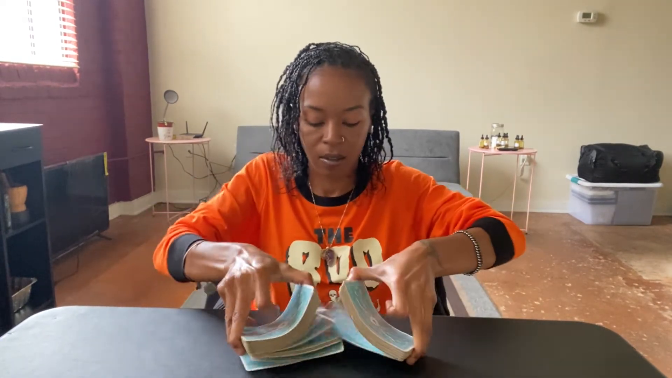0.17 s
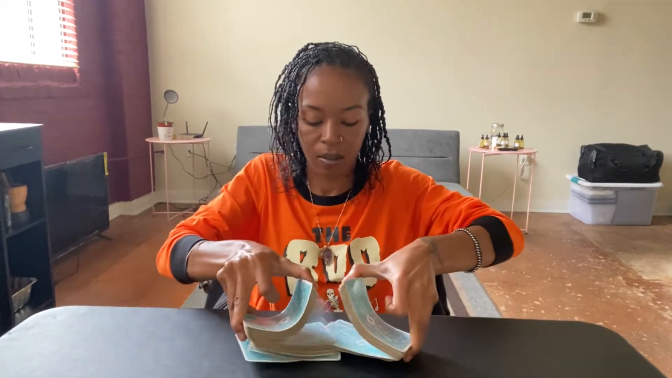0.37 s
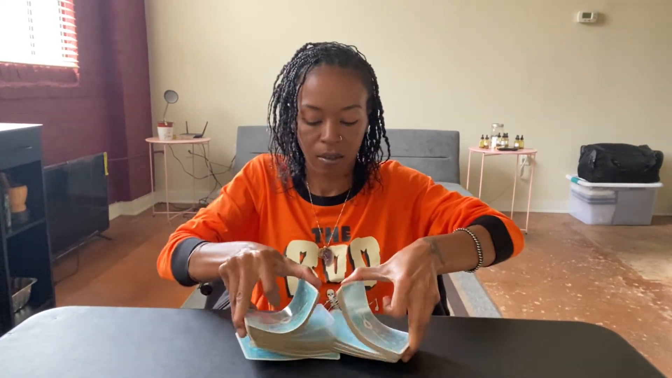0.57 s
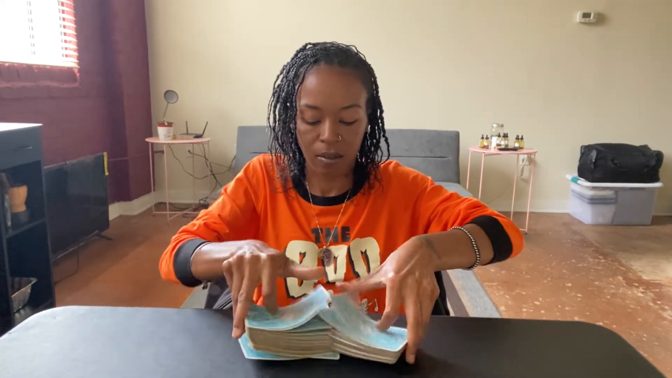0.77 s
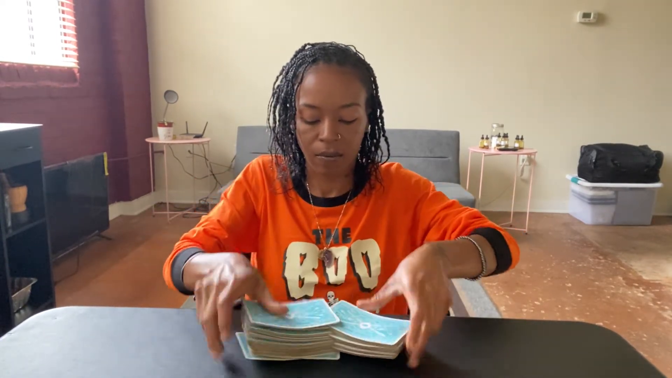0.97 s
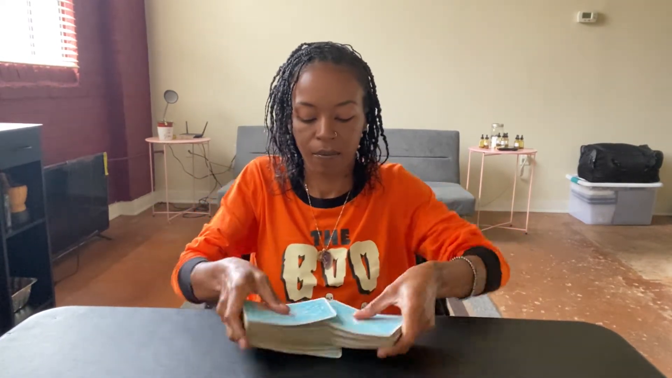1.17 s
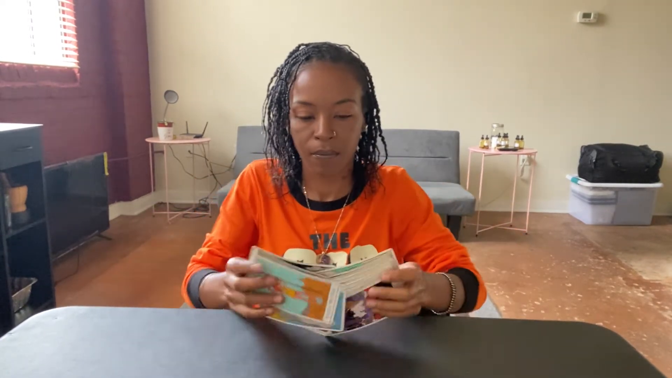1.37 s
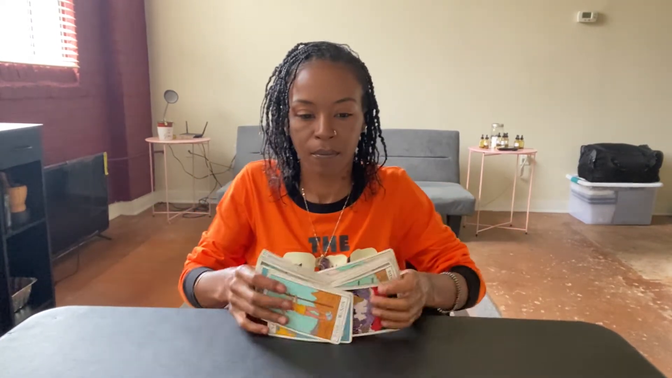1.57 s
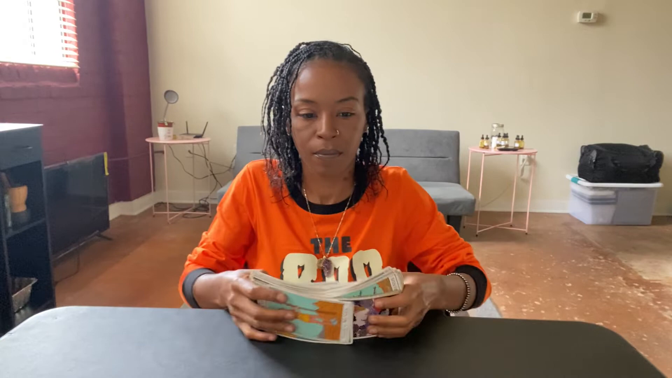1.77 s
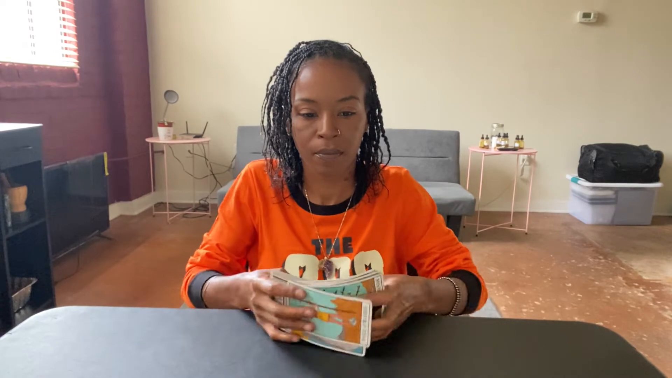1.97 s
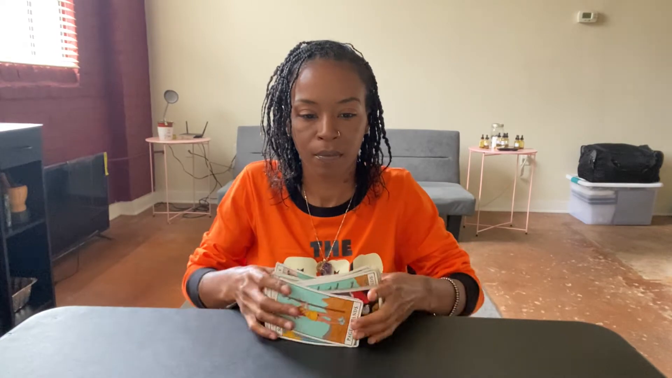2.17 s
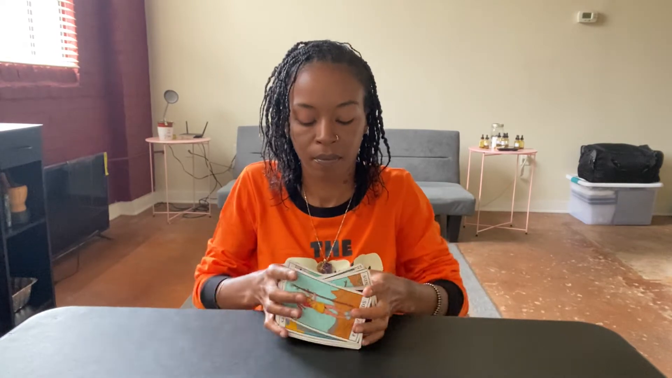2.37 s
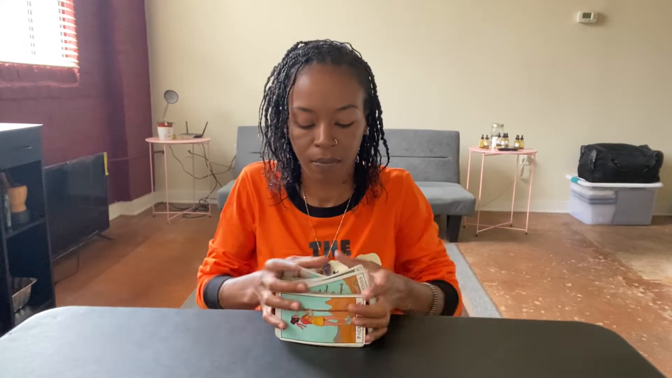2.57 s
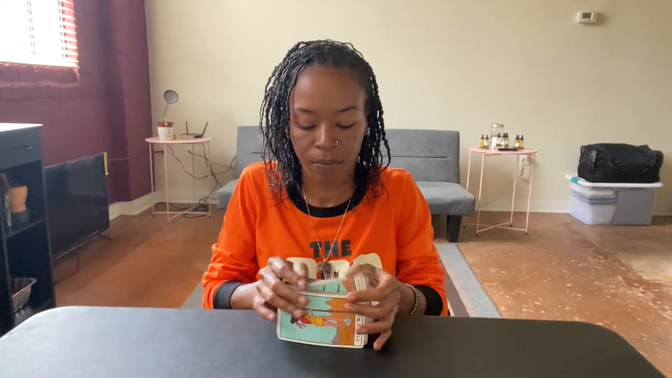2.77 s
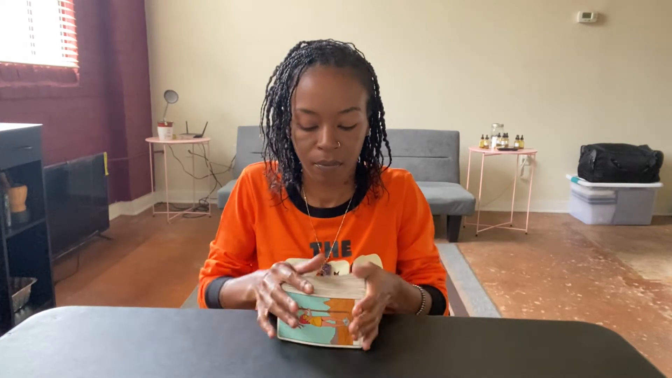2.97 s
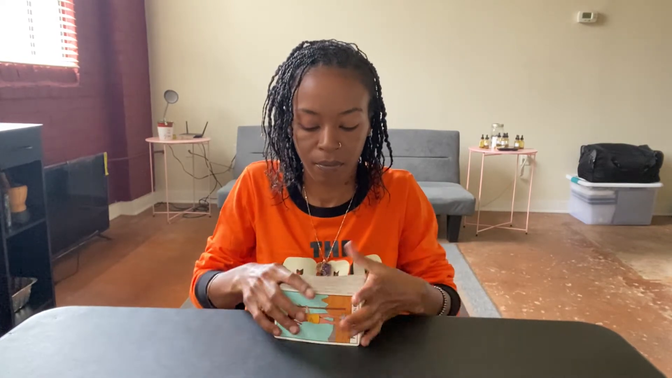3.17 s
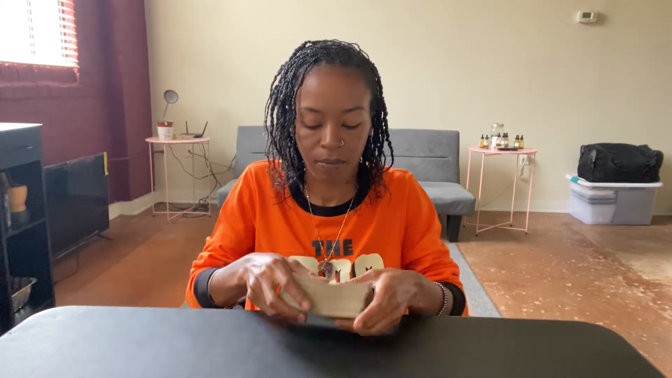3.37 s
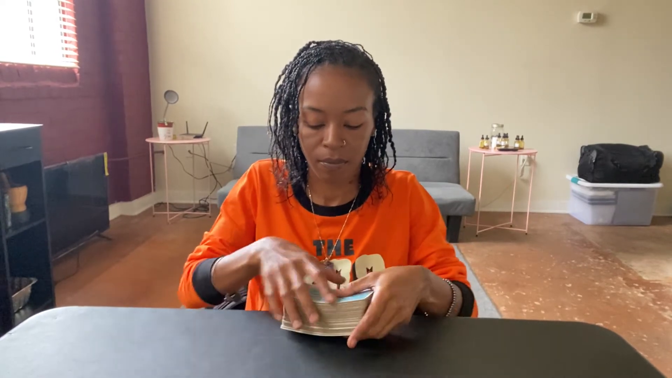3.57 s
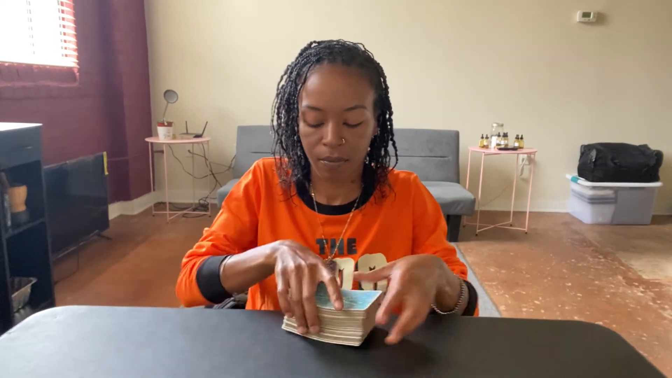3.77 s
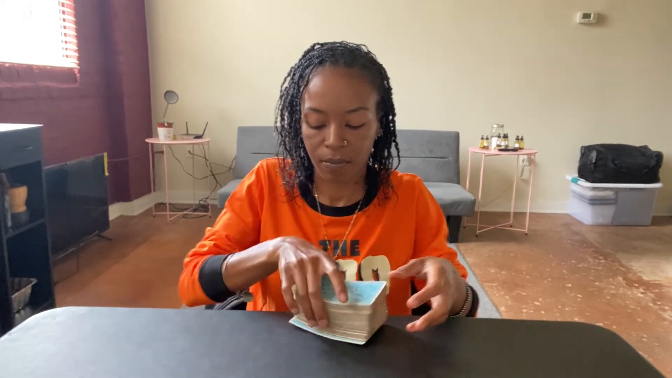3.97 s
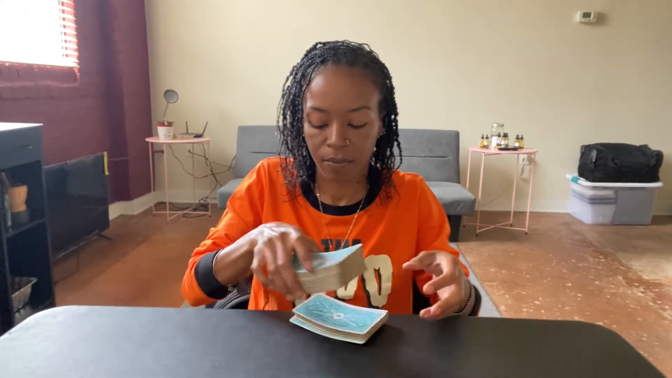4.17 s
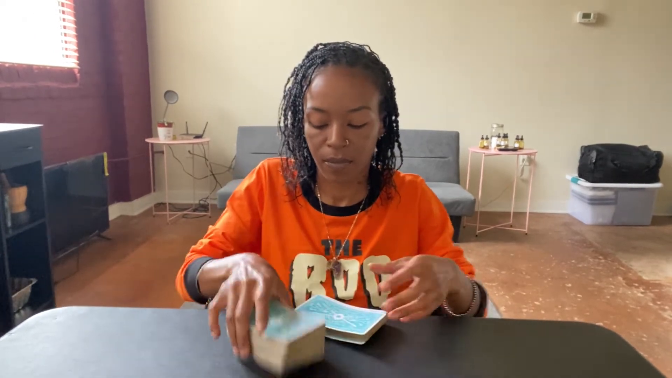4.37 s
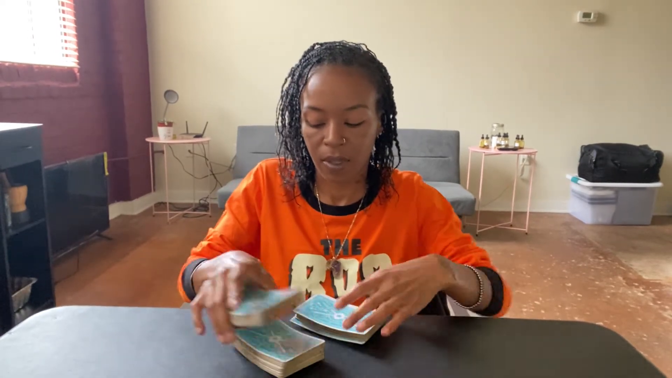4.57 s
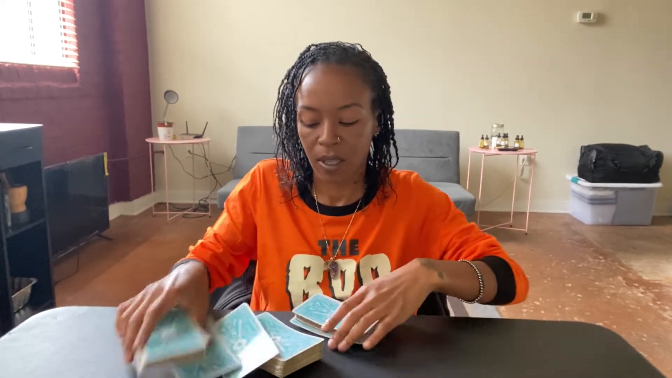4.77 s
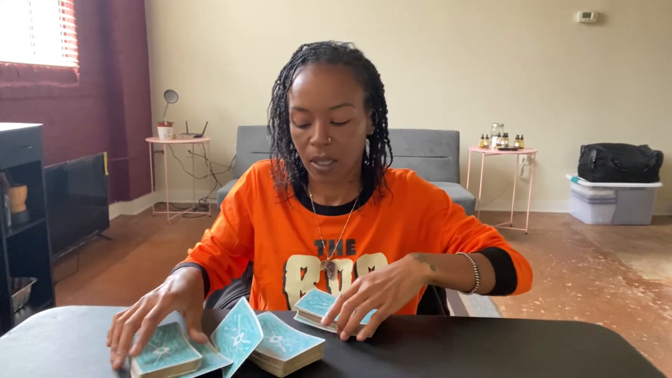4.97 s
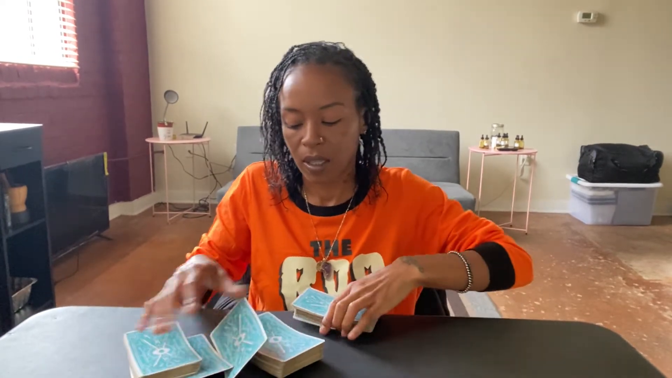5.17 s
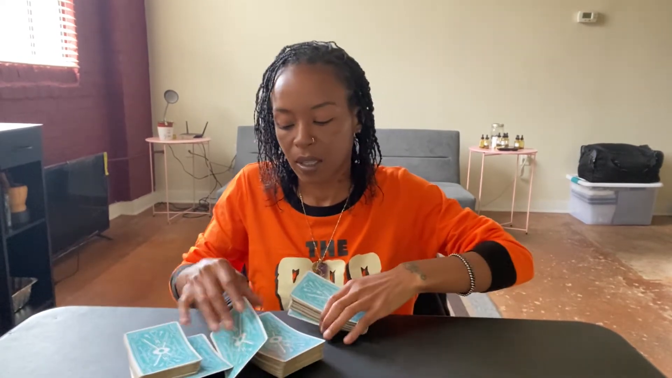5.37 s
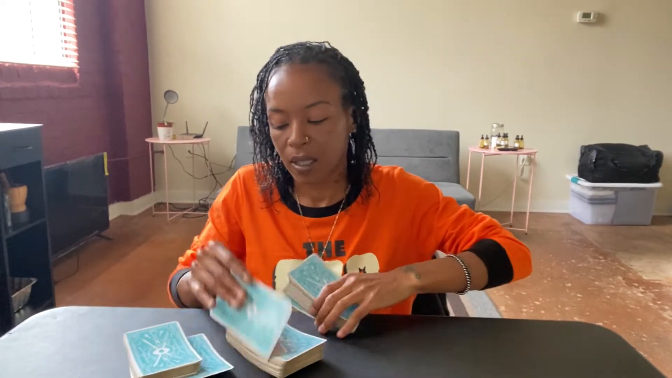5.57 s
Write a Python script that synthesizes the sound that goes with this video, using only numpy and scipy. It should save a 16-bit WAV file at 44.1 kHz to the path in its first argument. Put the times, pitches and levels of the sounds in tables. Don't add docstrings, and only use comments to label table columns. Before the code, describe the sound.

Large stiff cards riffle together in a crackling burst on a hollow table, clack while being squared, then drop in soft piles.

```python
import sys
import numpy as np
from scipy import signal
from scipy.fft import rfft, irfft
from scipy.io import wavfile
from scipy.ndimage import uniform_filter1d

SR = 44100
rng = np.random.default_rng(int(sys.argv[2]) if len(sys.argv) > 2 else 0)


def to_wav(sig):
    pcm = np.clip(np.atleast_2d(sig), -1, 1) * 32767
    pcm = np.round(pcm).astype(np.int16)
    wavfile.write(sys.argv[1], SR, pcm.T)


def ratio_of_db(decibels):
    return 10 ** (np.asarray(decibels, float) / 20)


N = 247266

# frequency in Hz, level in dB.
AIR = [(20, -21), (40, 1.5), (70, -13), (95, -1.5), (130, -8), (240, -14), (450, -16), (700, -20),
       (2500, -43.5), (10000, -45.5), (14000, -45), (15500, -85.5)]
# frequency in Hz, rms level in dB.
HUM = [(59.2, -39.5), (118.4, -60.5)]
# frequency in Hz, time to fall 60 dB in seconds.
REVERB_TIME = [(100, 0.36), (260, 0.23), (700, 0.78), (1800, 0.65), (5000, 0.73), (9000, 0.45),
               (15000, 0.573)]
# frequency in Hz, level in dB.
REVERB_LEVEL = [(100, -10), (400, 4.5), (1000, -5), (4000, 1), (12000, -8.5)]
# delay in seconds, left level in dB, right level in dB.
ECHOES = [
    (.0042, -1.5, -28),
    (.0078, -31, -3),
]
# frequency in Hz, level in dB.
CLOTH = [(2000, -6.5), (5800, -7.0), (7600, -18.5)]
# frequency in Hz, correlation from 0 to 1.
PORT_LIKENESS = [(60, .9), (250, .2), (700, .1), (2500, 0), (6300, 0), (7100, .5), (7900, .97),
                 (10500, .995), (16000, .9)]
# frequency in Hz, lead in radians.
LEFT_LEAD = [(0, .35), (300, -.1), (700, 0), (6200, -1.9), (8000, 0), (8800, .9), (9700, 2.4),
             (10500, 3.14), (13000, 6.28), (16200, 9.5)]
# frequency in Hz, left minus right in dB.
LEFT_LEAN = [(60, 0.9), (180, 1), (350, 2.5), (700, -0.3), (2200, 1.8), (5500, -0.5), (7100, -3),
             (8000, -0.5)]
# frequency in Hz, level in dB.
MIC = [(20, -34), (45, 0.5), (14500, -4.5), (16500, -12)]

# frequency in Hz, width in Hz, level in dB.
HOLLOW_MODES = [(431, 12.3, -16), (980, 126, -15.5), (1300, 360, -13.5), (1760, 580, -18)]
# frequency in Hz, width in Hz, level in dB.
TABLE_MODES = [(69.4, 22, 2), (113.6, 17, 1.5), (140, 11, 2), (174.1, 10, -5.5), (190.5, 21.5, -5.5),
               (361, 29, -14)]
# frequency in Hz, width in Hz, level in dB.
PILE_MODES = [(365, 100, 5), (411, 79, 15), (539, 87, 11), (780, 40, -7.5)]
# frequency in Hz, width in Hz, level in dB.
FACE_MODES = [(965, 297, 3), (1300, 40, 1.5), (1810, 380, -3), (2724, 1650, -15.5), (4350, 300, -21)]
# frequency in Hz, width in Hz, level in dB.
MUFFLED_MODES = [(3160, 1350, -3.0), (1900, 490, 4.1)]
# frequency in Hz, level in dB.
EDGE = [(500, -22), (900, -5), (1900, -1), (3200, 0), (4200, -3), (6000, -5), (9000, -10), (16000, -40)]
# frequency in Hz, level in dB.
HISS = [(2500, -1), (3300, -4), (4500, 0), (6500, -5), (8500, -8), (10000, -22.5)]
# frequency in Hz, level in dB.
FIZZ = [(6000, -37.5), (8000, -6), (10500, 2), (13000, -3), (15000, -13.5), (16500, -29)]

# time in seconds, sliding speed in dB,
# cupping of the hands round the deck in dB, weight on the table in dB.
SLIDE = [(0.0, -67, -19, -58), (0.149, -69, 20.5, -36.5), (0.33, -62.5, 15.5, -41.5),
         (0.549, -42, 10.5, -25), (0.72, -40.5, 10.5, -29), (0.86, -76, 24, -99), (1.039, -58.5, 7.5, -34),
         (1.251, -64.5, 7.5, -57.5), (1.62, -67, 10, -41), (1.86, -55, 6, -40.5), (2.3, -72.5, 11, -44),
         (2.6, -50.5, 11, -35.5), (2.99, -71.5, 8.5, -60.5), (3.281, -64, 3, -43), (4.2, -93, -8, -62.5),
         (4.65, -78.5, 16.5, -47), (4.88, -63.5, 14, -50.5), (5.35, -78, -4.5, -53.5)]
# start in seconds, peak in dB, hiss in dB against the scrape,
# fizz in dB against the scrape, fall in ms.
SCRAPES = [(0.264, -30.5, -9, -26.5, 8), (1.045, -20.5, -9.5, -39, 29.2), (1.549, -49, -31, -21, 22),
           (1.798, -26, -39.5, -51, 5.3), (1.877, -38.5, -4.5, -24, 24), (2.065, -33.5, -22, -35, 23),
           (2.32, -38.5, -11.5, -29.5, 23), (2.938, -44.5, -17, -25, 18), (3.212, -31.5, -16.5, -36, 23),
           (3.279, -43, -5, -22, 41), (3.341, -30, -17, -36, 12.4), (3.648, -34, -28, -40, 35),
           (4.601, -42.5, -44, -10.5, 2.2), (4.771, -36, 2.5, -37, 5.1), (4.785, -26.5, -5, -37, 19),
           (5.451, -46.5, -18.5, -34, 92), (5.556, -45, -29, -47, 14)]
# start in seconds, peak in dB, pitch in Hz, fall in ms,
# slap in dB against the boom.
LANDINGS = [(0.112, -22, 114, 1.7, -11), (0.158, -23, 122.2, 6.5, -26), (0.411, -28.5, 130.3, 11, -12),
            (0.464, -26.5, 135, 8.3, -36), (0.519, -18.5, 109.2, 13, -29), (0.558, -26, 157.4, 5.9, -31),
            (0.604, -13.5, 84.3, 8.2, -19.5), (0.662, -8, 121.6, 6.6, -23.5),
            (0.716, -12.5, 143.3, 10.8, -37.5), (0.748, -16, 90.2, 8.24, -47),
            (0.768, -17.5, 80.8, 2.6, -36), (1.021, -17, 159.6, 8.4, -25.5), (1.035, -5, 108, 2.86, -34),
            (1.084, -20.5, 137.5, 8.8, -26), (4.4227, -15.5, 140, 3.6, -17), (4.4297, -13.5, 140, 4.7, -19),
            (4.449, -14, 77.3, 2.9, -18.5), (4.475, -25, 159.6, 23, -15), (4.716, -21, 87.9, 3.2, -33),
            (4.779, -27, 152, 6.3, -10), (4.823, -20.5, 150, 13, -18.5), (4.841, -16, 166.2, 3.1, -23),
            (4.847, -13.5, 101.5, 6.2, -19.5), (4.8623, -19, 120.2, 11.8, -41)]
# start in seconds, peak in dB, pitch in Hz,
# slap in dB against the boom.
KNOCKS = [(1.462, -12.5, 196.6, -12.5), (1.474, -15, 197, -12.5), (1.698, -19.5, 158, 0.5),
          (1.769, -21, 110, -16.5), (1.92, -24, 79, -18), (2.015, -27, 95, -16), (2.067, -28, 106, -1),
          (2.13, -20.5, 122, -15), (2.292, -34.5, 82.6, 7), (2.453, -21, 155, 2.5), (2.552, -29, 128, -2.5),
          (2.901, -27.5, 80.7, -15.5), (3.014, -32.5, 118, -9.5), (3.248, -32.5, 88, -9),
          (3.329, -36, 80.7, 2), (3.503, -27.5, 82, -40.5)]
# start in seconds,
# peak in dB, pitch in Hz, fall in ms, slap in dB against the note.
UNDERTONES = [(0.103, -34.5, 2200, 1.8, -35), (0.103, -42, 3335, 2.8, -26), (0.599, -17, 355, 2.3, -27),
              (0.679, -21, 64.3, 24, -44.5), (1.462, -15.5, 83, 4.4, -32), (1.461, -18.5, 358, 3.1, -28),
              (1.7, -26, 476, 5.8, -27), (1.714, -21.5, 479, 2.9, -36), (1.7365, -18, 482, 3.1, -29),
              (1.773, -24, 505, 2.3, -36), (1.936, -33.5, 374, 4.7, -29), (2.079, -26.5, 434, 2.6, -35),
              (2.121, -24.5, 438, 1.9, -27), (2.41, -30, 406, 5.3, -33), (2.471, -21.5, 435, 2.1, -32),
              (2.548, -21, 413, 2.9, -33), (2.615, -29.5, 425, 3.4, -30.5), (3.353, -39.5, 447, 3, -31.5),
              (3.326, -32, 425, 20, -27.5), (3.424, -45.5, 416, 9.2, -29.5), (3.497, -52, 398, 5.5, -30.5),
              (3.655, -45, 944, 16, -31), (3.662, -53, 1835, 14, -29.5), (3.664, -52, 4350, 3.5, -30),
              (4.415, -27.5, 726, 3.5, -34.5), (4.418, -36, 1950, 2.2, -32), (2.795, -35.5, 129.7, 14, -34),
              (4.423, -17, 344, 4.1, -49), (4.844, -25, 328, 5.4, -31), (5.558, -40, 998, 9, -28.5),
              (5.562, -45.5, 1905, 3.8, -30), (5.562, -46, 394, 9, -32.5)]
# peak time in seconds, peak in dB, pitch in Hz, half length in ms.
OVERTONES = [(0.105, -41, 1000, 0.88), (0.509, -37, 4200, 1.2), (0.5975, -22, 1520, 1.2),
             (0.7115, -14.5, 1940, 0.82), (0.7235, -31, 4400, 1.2), (1.062, -42, 4400, 2),
             (1.4625, -32, 1500, 1.2), (1.4635, -22, 780, 3.1), (1.468, -13.5, 336, 1.6),
             (1.4815, -44, 2940, 1.8), (1.482, -33, 1600, 1.2), (1.489, -19, 408, 4.5),
             (1.6995, -37, 2380, 1.8), (1.7365, -42, 3060, 1.2), (1.741, -29.5, 2950, 1.2),
             (1.7425, -19.5, 1690, 1.4), (1.767, -48, 2720, 2.4), (2.017, -53, 3060, 1.2),
             (2.0655, -55, 3520, .8), (2.0655, -48, 7110, .8), (2.068, -35, 1810, 2.4),
             (2.105, -47, 4040, 1.8), (2.4075, -22.5, 1740, 1.6), (2.4075, -42.5, 3350, 1.4),
             (2.4575, -31, 2230, 1.6), (2.4565, -35, 3250, 1.2), (2.467, -45, 3200, 1.4),
             (2.547, -48, 7570, 1.2), (2.548, -45.5, 3500, 1.4), (2.616, -55, 7760, 1.2),
             (3.1735, -52.5, 3130, 2.4), (3.353, -54, 4430, 2.7), (3.3565, -53, 3340, 2.4),
             (3.4945, -54.5, 1900, 2.4), (3.673, -54.5, 1780, 7.2), (4.4145, -36, 2180, 1.1),
             (4.415, -43, 3050, 1.2), (4.421, -43, 3190, 1.1), (4.424, -54.5, 4500, 1.8),
             (4.457, -32.5, 1035, 2.4), (4.7505, -58, 5500, 1.2), (4.7505, -48, 8240, .8),
             (4.76, -51.5, 1800, 4.5), (4.774, -29, 4700, 1.1), (4.774, -33, 8600, .9),
             (4.7845, -31, 7960, .6), (4.785, -40.5, 5000, .9), (4.849, -45, 7500, .6),
             (4.796, -33.5, 1754, 6.6), (4.797, -49.5, 3170, 2.5)]
# peak time in seconds, peak in dB, hollow pitch in Hz,
# crack in dB against the pop, edge tick in dB against the pop.
RIFFLE = [(0.361, -18.5, 1690, -5.5, -19.5), (0.375, -24, 1045, -9.5, -30.5), (0.39, -26, 1270, -3, -15),
          (0.408, -30.5, 1110, -4, -7.5), (0.4115, -22.5, 905, -4.5, -30), (0.4294, -25, 960, -5.5, -24),
          (0.435, -24, 1020, -16, -17), (0.466, -39.5, 1100, -2, -28), (0.481, -24.5, 1200, -6.5, -12.5),
          (0.4835, -28, 1090, -18.5, -10), (0.4975, -27, 1130, -12, -26.5), (0.509, -13, 980, -18, -28),
          (0.52, -30, 1030, 7, -13), (0.5304, -20.5, 1230, -3, -14), (0.5329, -16, 1170, -9, -27.5),
          (0.544, -23, 1000, -6, -29), (0.553, -26, 975, -4, -11), (0.581, -38, 1035, -13, -27),
          (0.598, -11, 1035, -12.5, -16), (0.602, -16.5, 990, -6, -15), (0.617, -37, 1000, -11, -28),
          (0.63, -33, 1070, -19, -23.5), (0.644, -38, 1100, -3, -8), (0.6569, -14, 1260, -6, -8),
          (0.6639, -15, 1000, -14, -21), (0.6883, -29, 1300, -14, -23), (0.7113, -10.5, 1020, -16.5, -19),
          (0.7228, -29, 1000, 0.5, -20), (0.7283, -23, 1050, -12, -29.5), (0.739, -28.5, 1190, -8, -9),
          (0.7446, -19.5, 1020, -5.5, -36), (0.7575, -34, 1160, 2, -30), (0.8064, -44.5, 1240, 12.5, 0),
          (1.061, -33.5, 1300, -8, -38), (1.084, -33, 1900, -11, -34)]
# peak time in seconds, peak in dB, pitch in Hz,
# crack in dB against the pop, tick in dB against the pop.
FLICKS = [(0.108, -25.5, 1160, -6, -20), (0.155, -31, 1080, -9, -19), (0.2105, -34.5, 1320, -6, -19),
          (0.236, -35.5, 1240, 3, -12.5), (0.2692, -34, 1190, -3.5, -16), (0.288, -37.5, 1300, 1, -23),
          (0.592, -35.5, 1010, -7, -5), (3.172, -50, 983, 3.5, -10), (4.415, -32, 800, -4.5, -38),
          (4.423, -17.5, 780, -16, -29), (4.641, -49, 3070, -5, -25), (4.742, -42, 1110, -5.5, -16),
          (4.776, -35, 1680, 10, -3), (4.841, -32, 1210, -0.5, -16), (5.453, -55, 1096, -7.5, -11),
          (5.5615, -45.5, 1900, -12, -27), (5.5707, -37.5, 1020, -22, -39.5),
          (5.5758, -35.5, 1300, -15.5, -32.5)]
# peak time in seconds, peak in dB, pitch in Hz, crack in dB against the pop.
HELD_SNAPS = [(1.463, -30, 800, -15.5), (1.483, -19, 820, -18.5), (1.512, -29.5, 696, -34.5),
              (1.6466, -17.5, 886, -34), (1.7003, -20.5, 1840, -11.5), (1.704, -26.5, 1050, -39),
              (1.739, -12, 1170, -23), (1.741, -7, 1100, -28.5), (1.745, -13, 980, -16.5),
              (1.7564, -23, 1140, -14.5), (1.769, -25.5, 960, -12.5), (1.7706, -20.5, 1086, -34.5),
              (1.776, -25, 1020, -29), (2.017, -43.5, 870, -9.5), (2.066, -29, 1010, -14.5),
              (2.1083, -21, 900, -32.5), (2.1323, -19.5, 980, -42), (2.151, -21.5, 704, -46),
              (2.2712, -16.5, 1134, -34.5), (2.2924, -11, 1036, -29), (2.322, -30, 1000, -30),
              (2.4084, -11.5, 1057, -40), (2.4418, -19.5, 1030, -26), (2.4438, -27, 950, -26.5),
            (2.4534, -15, 860, -26.5), (2.4577, -10, 785, -18), (2.4642, -8, 1070, -34.5),
            (2.4675, -3.5, 1112, -29), (2.495, -23, 1320, -31.5), (2.499, -21.5, 1150, -33.5),
            (2.5113, -19, 880, -24.5), (2.5229, -14, 932, -25), (2.5349, -11.5, 960, -26.5),
            (2.5436, -18, 970, -25), (2.5485, -2.5, 1160, -28), (2.5568, -8.5, 894, -27.5),
            (2.5637, -28.5, 954, -17.5), (2.5784, -12.5, 1134, -31.5), (2.582, -31.5, 963, -28.5),
            (2.6132, -6, 1040, -24), (2.6182, -17, 973, -12), (2.6461, -21.5, 1122, -22),
            (2.651, -24.5, 1083, -13.5), (2.6678, -20, 1220, -39), (2.676, -12, 1144, -30),
            (2.6963, -24, 1240, -24.5), (2.844, -23.5, 905, -29), (2.997, -24.5, 982, -28.5),
            (3.0121, -12.5, 1050, -32), (3.22, -31.5, 1140, -33.5), (3.233, -30.5, 1090, -24),
            (3.346, -30.5, 920, -49.5)]


def evened(x):
    return x / np.sqrt(np.mean(x ** 2) + 1e-20)


def read(points, hz):
    f, value = np.transpose(points)
    return np.interp(np.log(hz + 1), np.log(f + 1), value)


def add(mix, s, sound):
    part = mix[max(round(s * SR), 0):][:len(sound)]
    part += sound[:len(part)]


def colour(x, points):
    n = x.shape[-1]
    gain = ratio_of_db(read(points, np.fft.rfftfreq(n, 1 / SR)))
    return irfft(rfft(x) * gain, n)


def tinted(x, points):
    power = ratio_of_db(2 * read(points, np.linspace(0, SR / 2, 500)))
    return colour(x, points) / np.sqrt(np.mean(power))


def ring(x, modes):
    out = 0
    for hz, width, db in modes:
        b, a = signal.iirpeak(hz, hz / width / 2.19, SR)
        out = out + ratio_of_db(db) * signal.lfilter(b, a, signal.lfilter(b, a, x))
    return out


def swell(t, rise, fall):
    shape = (1 - np.exp(-t / rise)) ** 2 * np.exp(-t / fall)
    return shape / shape.max()


def puff(t, rise, fall):
    after = (1 + t / fall) * np.exp(-np.maximum(t, 0) / fall)
    return np.where(t < 0, np.exp(-(t / rise) ** 2), after)


def burst(shape, grit):
    z = rfft(shape * grit)
    smooth = irfft(z / (abs(z) + 1e-9) ** .5, len(shape))
    return evened(smooth) * np.sqrt(np.mean(shape ** 2))


def paired(a, b):
    same = np.clip(read(PORT_LIKENESS, np.fft.rfftfreq(len(a), 1 / SR)), -1, 1)
    right = irfft(same * rfft(a) + np.sqrt(1 - same ** 2) * rfft(b), len(a))
    return np.array([a, right])


def background():
    air = ratio_of_db(-50.5) * evened(paired(*colour(rng.standard_normal((2, N)), AIR)))
    drift, throb = evened(colour(rng.standard_normal((2, N)), [(3, 4.5), (12, -53.5)]))
    turns = np.cumsum(1 + 0.00052 * drift) / SR
    hum = sum(np.sqrt(2) * ratio_of_db(db) * np.sin(2 * np.pi * hz * turns) for hz, db in HUM)
    return air + hum * ratio_of_db(0.38 * throb)


def room(x):
    out = np.zeros((2, N))
    spin = 2 * np.pi * 5.5 * np.arange(N) / SR
    onset = np.clip(np.arange(SR) / SR / .026, 0, 1)
    for share in (np.sin(spin), np.cos(spin)):
        hz, t, z = signal.stft(rng.standard_normal((2, SR)), SR, nperseg=256)
        t60 = read(REVERB_TIME, hz)[:, None]
        z = z * ratio_of_db(-60 * t / t60 + read(REVERB_LEVEL, hz)[:, None]) / np.sqrt(t60)
        tail = signal.istft(z, SR, nperseg=256)[1][:, :SR] * onset
        reply = paired(*tail) * np.sqrt(6 * np.log(10) / SR)
        out += signal.fftconvolve((share * x)[None], reply, axes=1)[:, :N]
    return out


def sliding():
    s, *controls = np.transpose(SLIDE)
    speed_db, cup_db, weight_db = (np.interp(np.arange(N) / SR, s, db) for db in controls)
    rustle, hiss, drum = ratio_of_db([speed_db + cup_db, speed_db, weight_db])
    scuff = ratio_of_db(weight_db - 8 + 0.11 * cup_db)
    clumps = ratio_of_db(4 * evened(uniform_filter1d(rng.standard_normal(N), 500)))
    slips = ratio_of_db(2.5 * np.minimum(rng.exponential(1, N), 5)) * (rng.random(N) < 1500 / SR)
    rub = clumps * (rng.standard_normal(N) * (0.42 + slips))
    edges = tinted(rub, HISS) + ratio_of_db(-13.5) * tinted(rub, FIZZ)
    edges = edges + ratio_of_db(-5) * ring(rub, [(2000, 380, 0.0032)])
    return (ratio_of_db(-2.5) * rustle * evened(ring(rub, HOLLOW_MODES))
            + ratio_of_db(4.5) * hiss * evened(edges)
            + ratio_of_db(-1) * drum * evened(ring(rub, TABLE_MODES))
            + ratio_of_db(-2.5) * scuff * evened(ring(rub, PILE_MODES)))


def scrapes():
    shapes, t = np.zeros((3, N)), np.arange(9000) / SR
    for s, db, hiss_db, fizz_db, fall_ms in SCRAPES:
        shape = swell(t, .35 * fall_ms / 1000, max(fall_ms, 3) / 1000)
        for row, rel_db in zip(shapes, (0, hiss_db, fizz_db)):
            add(row, s, ratio_of_db(db + rel_db) * shape)
    grain = ratio_of_db(1.5 * evened(uniform_filter1d(rng.standard_normal(N), 150)))
    face, hiss, fizz = shapes * grain * rng.standard_normal(N)
    return ratio_of_db(-1.5) * ring(face, FACE_MODES) + ratio_of_db(-5) * tinted(hiss, HISS) + ratio_of_db(7) * tinted(fizz, FIZZ)


def thumps():
    (booms, slaps), t = np.zeros((2, N)), np.arange(6000) / SR
    blows = [(*row, 4.6) for row in LANDINGS + UNDERTONES]
    blows += [(s, db, hz, 2.94, slap_db, 5.5) for s, db, hz, slap_db in KNOCKS]
    sag = 0.36 * 0.0059 * (1 - np.exp(-t / 0.0018))
    for s, db, hz, fall_ms, slap_db, rise_ms in blows:
        turns = hz * (t + (hz < 600) * sag)
        push = swell(t, rise_ms / 1000, max(fall_ms, 2) / 1000)
        add(booms, s, ratio_of_db(db) * push * np.sin(2 * np.pi * turns))
        grit = rng.standard_normal(len(t))
        add(slaps, s, ratio_of_db(db + slap_db) * burst(swell(t, .002, .003), grit))
    slaps = signal.lfilter(*signal.butter(2, 900, fs=SR), slaps)
    slap = ratio_of_db(15) * ring(slaps, [(405, 1700, 0.0049)]) + ring(slaps, PILE_MODES)
    return booms + ratio_of_db(-9) * ring(booms, TABLE_MODES) + slap


def overtones():
    out, t = np.zeros(N), np.arange(-900, 900) / SR
    for s, db, hz, half_ms in OVERTONES:
        bell = np.exp(-(t * 1000 / half_ms) ** 2)
        add(out, s + t[0], ratio_of_db(db) * bell * np.sin(2 * np.pi * hz * t))
    return out


def snaps():
    pops, cracks, muffled, ticks = np.zeros((4, N))
    t = np.arange(-220, 660) / SR
    crack_shape, tick_shape = puff(t, .0015, .00075), puff(t, .00044, .00022)
    cards = [(*row, cracks, 0.71) for row in RIFFLE + FLICKS]
    cards += [(*row, row[-1] - 48, muffled, 0.78) for row in HELD_SNAPS]
    for s, db, hz, crack_db, tick_db, crack_mix, pop_ms in cards:
        start, pop_s = s + t[0], pop_ms / 1000
        tone = np.sin(2 * np.pi * hz * t) + 0.1 * np.sin(2 * np.pi * 1.62 * hz * t)
        add(pops, start, ratio_of_db(db) * puff(t, 1.67 * pop_s, 0.57 * pop_s) * tone)
        grit = rng.standard_normal(len(t))
        edge_start = start - .0007
        add(crack_mix, edge_start, ratio_of_db(db + crack_db) * burst(crack_shape, grit))
        add(ticks, edge_start, ratio_of_db(db + tick_db) * burst(tick_shape, grit))
    hollow = pops + ratio_of_db(-5) * ring(pops, HOLLOW_MODES)
    free = ratio_of_db(-0.5) * tinted(cracks, EDGE) + ratio_of_db(9) * tinted(ticks, FIZZ)
    held = ratio_of_db(11.5) * ring(muffled, MUFFLED_MODES) + ratio_of_db(-16) * tinted(muffled, EDGE)
    return hollow + free + held


def scene():
    cards = snaps() + overtones() + scrapes()
    near = cards + thumps() + sliding()
    dull = colour(cards, CLOTH)
    echoes = sum(ratio_of_db(db)[:, None] * np.roll(dull, round(s * SR)) for s, *db in ECHOES)
    return near + echoes + room(near) + background()


def roll_off(x):
    return signal.sosfilt(signal.butter(12, 16660, fs=SR, output="sos"), x)


def record(dry):
    n = N + 2 * SR
    padded = np.pad(dry, ((0, 0), (SR, SR)), "reflect", reflect_type="odd") * signal.windows.tukey(n, .2)
    hz = np.fft.rfftfreq(n, 1 / SR)
    half = np.exp(.5j * np.interp(hz, *np.transpose(LEFT_LEAD))) * ratio_of_db(.5 * read(LEFT_LEAN, hz))
    spectrum = rfft(padded) * np.array([half, 1 / half]) * ratio_of_db(read(MIC, hz))
    ports = irfft(spectrum, n)[:, SR:SR + N]
    return roll_off(ports)


dry = scene()
out = record(dry)
to_wav(out)
```